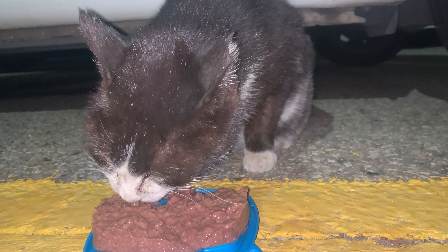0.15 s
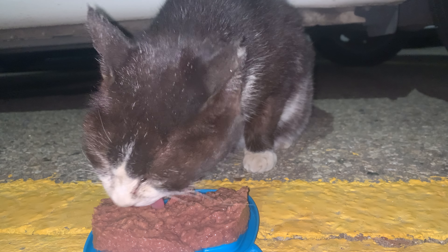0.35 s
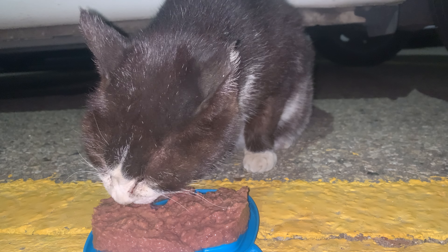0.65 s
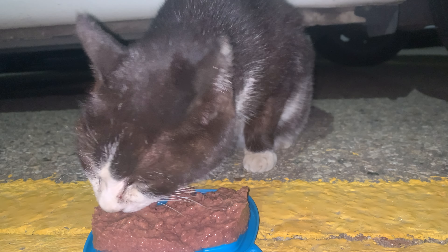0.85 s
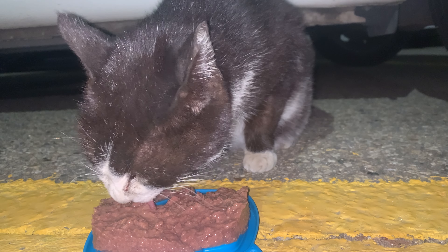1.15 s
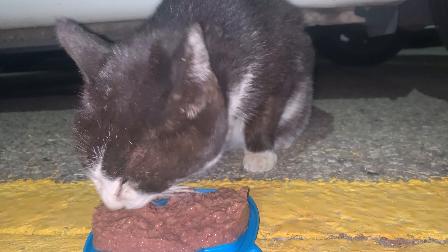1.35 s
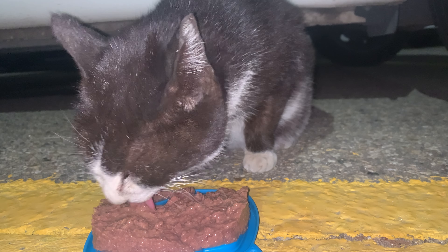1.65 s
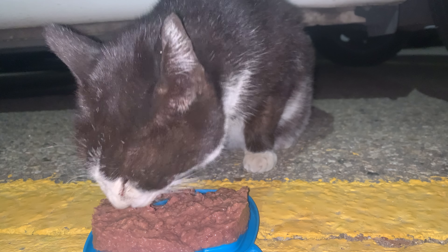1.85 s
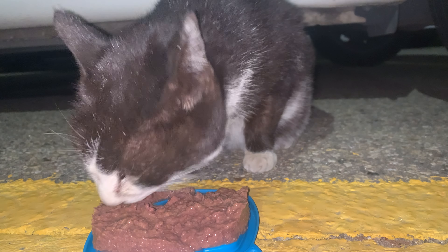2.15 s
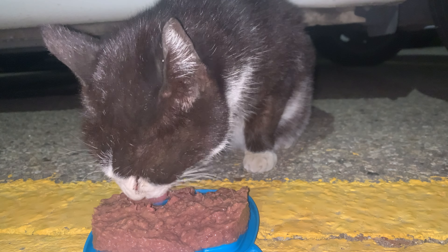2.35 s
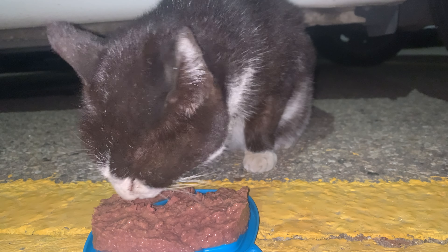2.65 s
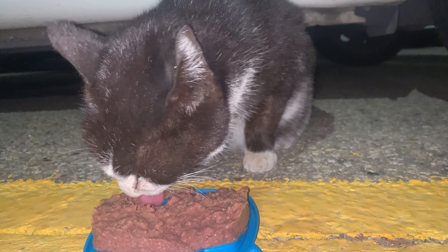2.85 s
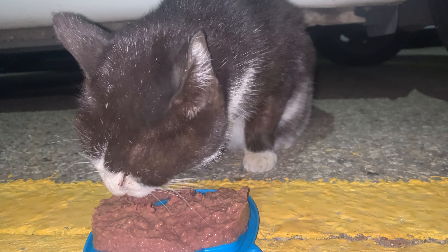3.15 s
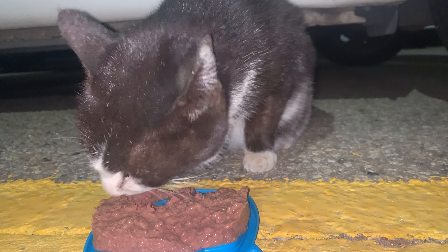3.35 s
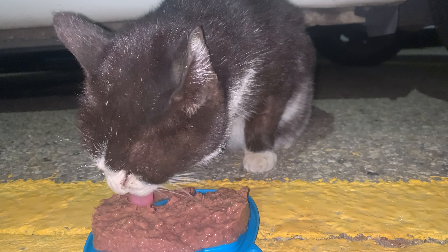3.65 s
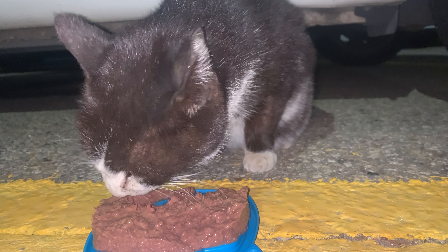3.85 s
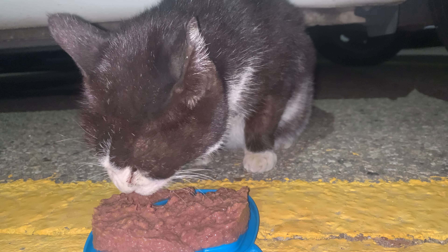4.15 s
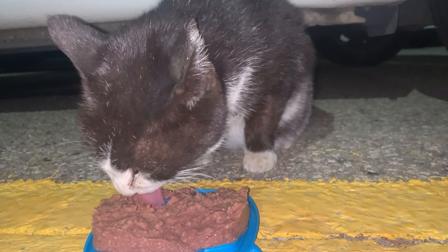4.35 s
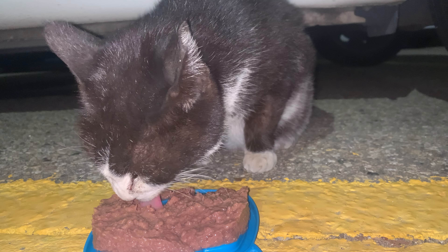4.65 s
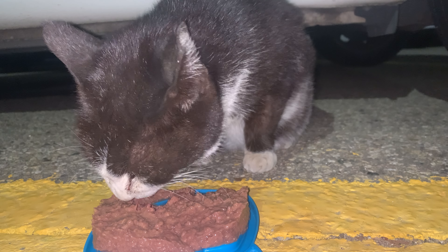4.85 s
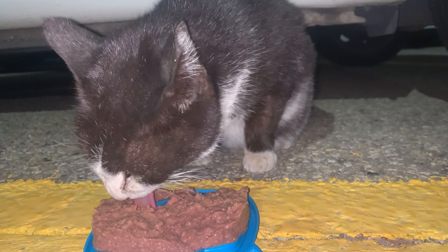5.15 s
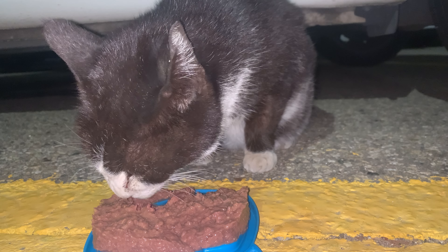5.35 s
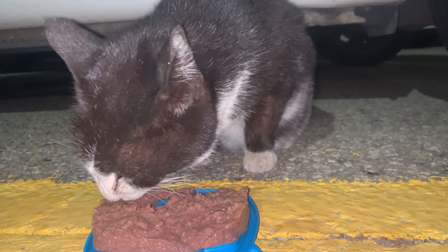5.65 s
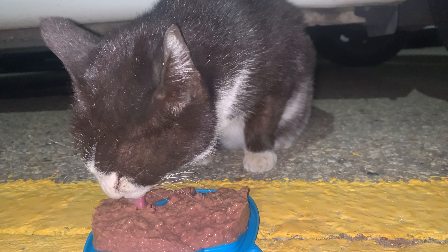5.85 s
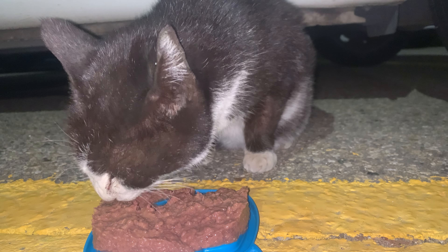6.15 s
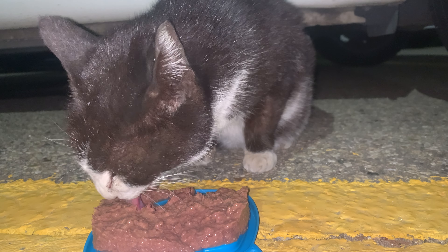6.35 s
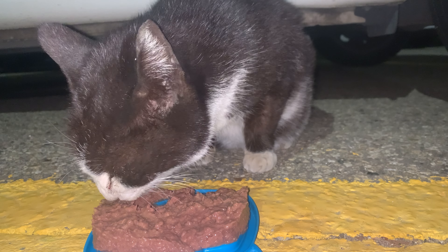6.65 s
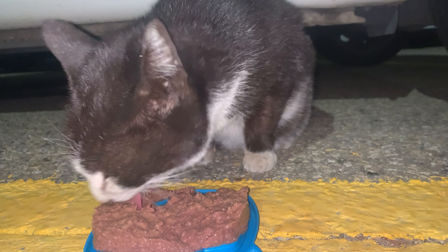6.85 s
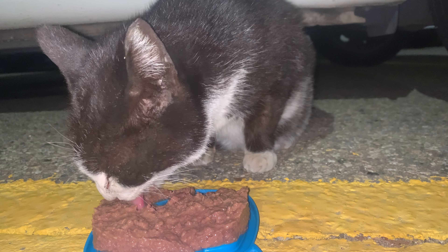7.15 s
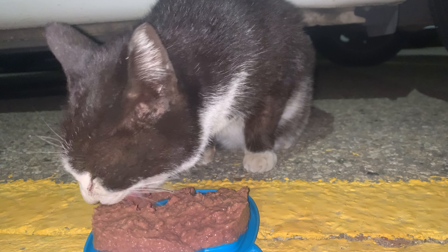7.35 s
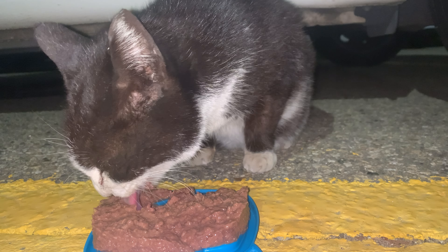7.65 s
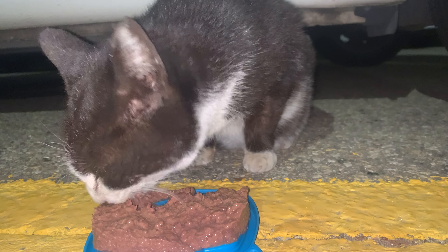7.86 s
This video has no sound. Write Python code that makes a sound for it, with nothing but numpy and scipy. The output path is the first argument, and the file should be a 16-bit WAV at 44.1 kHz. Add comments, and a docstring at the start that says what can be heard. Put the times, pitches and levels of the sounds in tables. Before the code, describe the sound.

A low, soft traffic rumble lies under the whole eight seconds, with bass noise rising and falling and a faint hiss. Small metallic taps come from the right at 0.2 and 0.4 s. Close by, a cat's tongue makes tiny bright wet ticks and faint strokes through paste around 0.5 to 1.25 s. At 1.75 to 1.9 s metal clatters loudly with a ringing, jangling burst, and another clank follows at 2.25 s. Light rattles, wet ticks and short hollow blips lead from 2.4 s, with a soft smeary lick at 3.15 s. The hardest clang hits at 3.6 s, booming and bright, then rocks and knocks until about 4.5 s, its tail fading in the open yard. Faint metal friction lingers until 6 s. Sparse taps and licks continue, with a clear blip at 5.7 s. From 7.2 s a distant motor hums in, wavering and slightly rising.

```python
"""At night, far traffic noise lies under everything, with low bass noise that rises and falls.
Early on, to the right, metal in a yard is struck: flurries of contacts ring its modes, and some boom.
Soon a cat close by licks wet food from a dish beside a parked car: ticks are short sinking tones, strokes are
swells of noise grains. Short hollow blips follow, ringing tones with noise. The metal also rocks and slides.
Near the end a distant motor fades in, speeding up a little: wavering partials over a low noise rumble."""
import sys
import numpy as np
from scipy import signal
from scipy.fft import irfft
from scipy.io import wavfile
from scipy.ndimage import uniform_filter1d

SR = 44100
rng = np.random.default_rng(int(sys.argv[2]) if len(sys.argv) > 2 else 0)


def pcm_store(signal):
    """Save signal as 16-bit PCM."""
    levels = np.round(np.clip(np.atleast_2d(signal), -1, 1) * 32767)
    wavfile.write(sys.argv[1], SR, levels.astype(np.int16).T)


N = 353682  # length in samples

# Colour of the night air. Each row: pitch in Hz, relative strength in dB per Hz.
AIR_COLOUR = [(15, -51.5), (30, -28.5), (43, -5.5), (60, 0.5), (100, -5.5), (165, -12.5), (300, -21.5),
              (600, -23.5), (950, -19), (1700, -28), (2400, -37), (3200, -51.5), (4200, -59), (7000, -74)]
AIR_DB = -43  # level before the swells change it
# Left-right likeness used for air and hiss; the top treble is mono.
# Each row: pitch in Hz, likeness from -1 to 1.
AIR_LIKENESS = [(60, 0.96), (110, 0.96), (200, 0.827), (380, 0.54), (700, -0.35), (1290, -0.38),
                (2380, 0.2), (4400, -0.17), (8120, -0.51), (15000, 1)]
# Swells of the background. Each row: time in seconds, then the swell in dB of the rumble, the drone and
# the upper hiss (partly the metal's lingering ring), each scaled by its reach below.
AIR_SWELLS = [(0, -3, 2, 0.5), (1.1, -3.5, 3.5, 5), (1.6, -5.5, 3, -0.5), (3.3, -1.5, 1, 9),
              (4.4, -3.5, 4, 5.5), (5.901, -3, 1.5, -1.5), (7.2, -5, -1.5, 3.5), (7.55, 6, -1, 12),
              (8.02, -10, 3.5, 8.5)]
# How much of its swell each part gets. Each row: pitch in Hz, share as a factor.
RUMBLE_REACH = [(100, 0.71), (200, 0.043)]
DRONE_REACH = [(90, 0.026), (190, 0.38), (280, 0.872), (420, 0.33), (800, 0.36), (2500, 0.464)]
HISS_REACH = [(2500, 0.13), (3400, 1.04), (4300, 1.12), (7000, 0.22), (11000, 0.11)]
# The low bass noise. Each row: time in seconds, level in dB.
BASS_LEVEL = [(0, -48), (1.3, -48.5), (1.8, -42.5), (3.7, -45.5), (4.3, -48), (4.7, -49), (6.2, -54),
              (6.801, -45), (8.02, -54)]

# Blows on the metal. Each row: start in seconds, strength in dB, brightness in dB per octave,
# basic rattle time in seconds, pitch of the struck spot in Hz, its boost in dB, level of the high singing in dB.
METAL_BLOWS = [(.209, -48, -3.5, 0.0098, 1250, 4.5, -77), (.229, -54.5, 7, 0.0084, 1400, 10, -62),
               (.426, -62.5, -5, 0.0031, 1050, 4, -92), (.55, -77, -9.5, 0.0086, 396, 2, -92),
               (1.757, -39.5, -2.5, 0.0098, 1110, 1.5, -71), (1.7695, -27, 1.5, 0.004, 990, 4.5, -57),
               (1.786, -35.5, 4, 0.013, 1400, 7, -47), (1.852, -32.5, -0.1, 0.0065, 1560, 1, -47),
               (1.871, -43.5, 5, 0.0047, 1590, 3, -53), (1.892, -40, 2.5, 0.0075, 1400, -4, -45.5),
               (2.176, -56, 2, 0.0084, 1500, 4, -74), (2.246, -39, -2.5, 0.0071, 1070, 5.5, -68),
               (2.256, -36, 2.5, 0.0062, 1150, 2, -52), (2.558, -71, 9, .0125, 2000, -2, -81),
               (2.62, -70.5, 9, 0.011, 2000, 10, -80), (2.692, -50, -0.5, 0.019, 1500, -7, -72),
               (2.724, -50.5, 4, 0.0041, 1000, -1, -54), (2.818, -47, 2, 0.011, 1724, 4, -71),
               (3.329, -55, 4, 0.0074, 2210, 5, -63.5), (3.383, -45.5, 3.5, 0.0039, 6560, 8.5, -56.5),
               (3.601, -47.5, 1, 0.0045, 1986, 18, -60), (3.609, -23.5, 1, 0.0055, 1700, 6.5, -44.5),
               (3.63, -27.5, 5.5, 0.0051, 2130, 4.5, -34.5), (3.635, -28.5, 0, 0.0039, 1450, 8, -56),
               (3.661, -34, 0.5, 0.0049, 2130, 5, -43), (3.744, -30, 1.6, 0.003, 1400, -9, -49),
               (3.829, -41.5, 0, 0.02, 2030, 4.5, -60), (3.884, -38, 2, 0.0085, 1910, 2, -45),
               (4.164, -49.5, -1.5, 0.008, 1700, 9.5, -62), (4.332, -47.5, 1.5, 0.0075, 1500, 1, -61),
               (4.434, -51.5, 0.5, .003, 1800, 0, -73), (4.476, -51.5, -0.4, 0.0021, 3880, 8.5, -80),
               (5.14, -53.5, 0, 0.0073, 1280, 4, -67), (5.259, -58, 2.5, 0.003, 1310, 12, -74),
               (5.526, -56, -3, 0.00217, 3400, 11.5, -81), (7.511, -65.5, -6.5, 0.015, 301, 7, -90),
               (7.99, -47, -4.5, 0.0098, 1110, 2.5, -72)]
# The metal's thud, clunk, clank, ring and jingle. Each row: lowest and highest pitch in Hz.
REGISTER_BANDS = [(120, 700), (700, 1400), (1400, 2700), (2700, 7000), (7000, 17000)]
# The same five. Each row: dB in a full blow, growth in dB per dB of strength,
# extra rattle length in a full blow as a multiple (below zero shortens it).
REGISTER_SETTINGS = [(1, 0.91, 2.5), (7, 1.05, -0.5), (3, 1.03, 0), (-7.5, 0.88, 3), (-4.5, 1.092, 1)]
# The metal's many close modes. Each row: pitch in Hz, relative strength in dB per Hz.
METAL_COLOUR = [(140, -9.5), (200, -9.5), (270, 1.5), (340, -0.5), (430, -4), (540, 2), (650, -11),
                (790, -2), (920, 3.5), (1000, -1), (1070, 0.5), (1170, -0.5), (1350, -1), (1510, -1),
                (1660, -3), (1920, -5), (2100, -6), (2450, -9.5), (2900, -13), (4250, -19), (4680, -23),
                (5150, -17.5), (5550, -20.5), (6400, -15.5), (7400, -19), (8200, -12.5), (9800, -9.5),
                (12500, -21.5), (14200, -17), (15700, -19)]
# Single modes that ring on. Each row: pitch in Hz, dB added to the metal's colour and a shared level.
RINGING_MODES = [(802, 2), (926, 1), (1055, 2), (1324, 1), (1475, 2), (1660, 2), (2083, 4), (2243, 1),
                 (2660, 3), (3050, 3), (3340, 5), (3396, 6), (3994, 5), (4301, 2), (4470, 6), (4905, 4),
                 (5011, 5), (5124, 6), (5184, 7), (5932, 5), (6630, 6), (8128, 6), (8198, 5), (8624, 6),
                 (10109, 9), (10282, 5), (10804, 5), (10965, 5), (11924, 6), (12177, 5), (13899, 8),
                 (14160, 2)]
# How long single modes ring. Each row: pitch in Hz, time in seconds to fall 60 dB.
RINGING_TIMES = [(850, .16), (2000, .22), (4100, .28), (5150, .42), (6500, .34), (10000, .28), (14000, .28)]
# The yard's tail. Each row: pitch in Hz, time in seconds to fall 60 dB.
YARD_TAIL = [(200, 1), (1000, 0.6), (2500, 0.68), (5000, 0.68), (9000, 0.38), (15000, .3)]
# Left-right likeness used for the metal; its top treble is mono, before the balance and phase below.
# Each row: pitch in Hz, likeness from -1 to 1.
METAL_LIKENESS = [(200, 1), (500, 0.92), (1000, 0.42), (4000, 0.24), (8000, 0.27), (12000, 1)]
# Where the metal stands. Each row: pitch in Hz, phase in radians by which left leads (negative: lags).
METAL_LEAD = [(100, -.05), (300, -.5), (700, -2), (950, -1.5), (1350, -2.5), (1800, -4.1), (2200, -5.3),
              (3000, -9), (4200, -12.5), (16000, -12.6)]
# Where the metal stands. Each row: pitch in Hz, left level minus right level in dB.
METAL_BALANCE = [(250, -.5), (540, -6.5), (900, -6), (1300, -2.5), (2400, .5), (4400, 3.5), (8000, .5)]
# How unevenly each spot favours the modes. Each row: pitch in Hz, unevenness in dB.
SPOT_RIPPLE = [(500, 1), (2000, 2), (4000, 3.5), (14000, 4)]
# The longest-singing clusters of modes. Each row: middle in Hz, width in Hz, relative level in dB
# before a random change, time in seconds to fall 60 dB.
SINGING_CLUSTERS = [(3330, 50, -5, .36), (4010, 55, -6, 0.3), (4440, 50, -13, .38), (5146, 150, 1, 0.37),
                    (5930, 63, -7, .33), (6630, 90, -8, 0.28), (8200, 340, -7.5, .4)]
PIVOT_HZ, FULL_DB = 2160, -17.5  # brightness tilts the colour about this pitch; strength of a full blow
FULL_TOP_HZ, TOP_HZ_PER_DB = 18300, 195.5  # a full blow reaches this high; a softer one less so
# Single modes that boom or sing out. Each row: start in seconds, pitch in Hz, level in dB at the right port,
# rise in seconds, time in seconds to fall 60 dB.
BOOMING_MODES = [(.212, 340, -29, .002, .05), (.22, 870, -33.5, .008, .18),
                 (.431, 391, -40.5, 0.0083, 0.17), (.548, 340, -45, .008, .12),
                 (1.772, 5140, -41.5, 0.011, 0.37), (1.892, 5160, -45, .006, 0.48),
                 (3.632, 5120, -35, .006, 0.26), (4.168, 5200, -57, 0.0044, 0.23),
                 (4.333, 5180, -50.5, 0.0032, 0.17), (4.475, 3920, -50, 0.0009, 0.046),
                 (1.771, 790, -23, 0.0038, 0.098), (1.772, 562, -26, 0.0067, 0.27),
                 (1.774, 1620, -23, .003, .08), (1.855, 1336, -26, .003, .1),
                 (1.856, 4000, -45, .004, 0.27), (1.78, 3390, -31.5, .006, 0.24),
                 (2.246, 1044, -21.5, .003, .09), (2.254, 1360, -27, 0.0033, .08),
                 (2.256, 1550, -25, .003, .13), (3.614, 259.7, -14, .023, 0.07),
                 (3.61, 873, -9.5, 0.0057, .06), (3.618, 1520, -17, .004, 0.099),
                 (3.612, 2246, -21, 0.0033, 0.15), (3.661, 2092, -21.5, .003, 0.084),
                 (3.745, 2680, -34, .003, 0.065)]

# Wet ticks of the tongue. Each row: time in seconds, level in dB before filtering, starting pitch in Hz.
TONGUE_TICKS = [(0.508, -54, 12000), (0.569, -53, 10000), (0.6444, -23, 10300), (0.9652, -49, 11700),
                (1.0107, -36, 9460), (1.0207, -49, 6300), (1.0998, -25.5, 5730), (1.1931, -46, 5990),
                (1.2526, -51, 10500), (2.5187, -46, 6520), (2.176, -42, 9500), (2.8672, -30, 6560),
                (2.8826, -35, 8380), (3.29, -32.5, 6900), (5.8067, -39.5, 5000), (6.8605, -36, 10560),
                (7.2516, -39.5, 6870), (7.6, -47.5, 8100), (7.7111, -42.5, 6980), (7.7297, -49, 6760)]
# Threads of saliva snap faintly around each stroke: typical level, typical pitch and spread in time.
STRAY_DB, STRAY_HZ, STRAY_SPREAD_S = -53, 9380, .13
# Strokes through the food. Each row: start in seconds, length in seconds, level in dB, pitch in Hz.
LICK_STROKES = [(0.616, 0.069, -65.5, 8500), (0.796, 0.053, -79, 7500), (0.979, 0.18, -72.5, 7000),
                (3.151, 0.11, -51.5, 2060), (3.183, 0.11, -71, 7000), (4.752, 0.04, -64, 4360),
                (5.785, 0.054, -71.5, 5200), (6.745, .045, -75.5, 7000), (7.166, 0.032, -69.5, 7450),
                (7.196, 0.096, -67.5, 6470), (7.687, 0.13, -72.5, 6070)]

# Knocks of the rocking metal. Each row: start in seconds, level in dB, pitch of the struck spot in Hz.
ROCKING_KNOCKS = [(1.939, -45, 800), (1.988, -51, 900), (2.389, -46, 1030), (3.94, -40.5, 2050),
                  (3.97, -42.5, 1810), (4.02, -39.5, 1350), (4.07, -42, 1690), (4.147, -40.5, 1500)]
ROCK_BOOST_DB, ROCK_RATTLE_S, ROCK_TOP_HZ = -1, 0.013, 3380
# Short hollow blips, some from the mouth and some from ringing metal. Each row: start in seconds,
# level in dB before mixing and filtering, middle of the pitch glide in Hz, rise in seconds,
# time in seconds for the ring to fall 60 dB.
HOLLOW_BLIPS = [(2.384, -41.5, 1044, .01, 0.077), (2.673, -46, 1496, .004, 0.075),
                (2.839, -45, 1470, .001, 0.046), (2.864, -39, 1593, .003, 0.11),
                (3.054, -38.5, 1807, .002, 0.12), (3.076, -38.5, 1790, 0.0011, .04),
                (3.166, -41, 1570, 0.0018, 0.072), (3.189, -41, 956, .001, .04),
                (3.2, -55, 2050, .002, 0.065), (3.223, -36, 933, .007, 0.053),
                (3.406, -41, 996, .003, 0.056), (3.424, -37.5, 2140, .002, .09),
                (3.7255, -19, 1320, .0005, 0.031), (3.829, -31, 1100, .001, 0.055),
                (3.832, -41, 1600, .001, 0.044), (3.885, -33, 1340, .003, .06),
                (3.974, -42, 1810, .002, 0.064), (4.022, -38.5, 930, .005, .07),
                (4.042, -43, 1450, .001, 0.047), (4.073, -42, 903, 0.0034, .06),
                (4.124, -38, 910, .004, 0.12), (4.151, -47, 1910, .002, .05),
                (4.3005, -28.5, 1400, .0007, 0.06), (4.475, -37, 950, .001, 0.032),
                (5.729, -26.5, 1268, .0003, 0.063)]
BLIP_TONE = .85  # gain of the clear pitch in a blip
SLIDE_START_S, SLIDE_END_S, SLIDE_FADE_S, SLIDE_DB = 2.8, 6.01, 0.33, -72
MOTOR_START_S, MOTOR_RISE_S, MOTOR_HZ, MOTOR_HZ_PER_S = 7.22, 0.22, 114.4, 7.35
MOTOR_DB = -46.5  # level of the hum
# The motor's partials. Each row: multiple of the firing rate, relative level in dB.
MOTOR_MIX = [(1, -9), (2, 0), (3, -6.5), (4, -13.5), (5, -17.5)]

# The microphone's own hiss. Each row: pitch in Hz, relative strength in dB per Hz.
HISS_COLOUR = [(3000, -13), (6500, -1.5), (7800, 5), (9000, 1), (11500, 0), (15000, -10)]
HISS_DB, EDGE_HZ = -79, 15850  # hiss level; the recorder passes nothing much above the edge


def amp(db):
    """Turns decibels into a gain."""
    return 10 ** (np.asarray(db) / 20)


def evened(x):
    """Scales a signal to an average (rms) level of 1."""
    return x / np.sqrt(np.mean(x ** 2) + 1e-30)


def read(points, hz):
    """Reads between the rows of a pitch table, on a log scale of pitch."""
    f, value = np.transpose(points)
    return np.interp(np.log(hz + 1), np.log(f + 1), value)


def add(mix, s, sound):
    """Mixes a sound in at time s."""
    part = mix[..., max(round(s * SR), 0):][..., :sound.shape[-1]]
    part += sound[..., :part.shape[-1]]


def band(x, lo, hi, order=4):
    """Keeps only the pitches between lo and hi."""
    sos = signal.butter(order, [lo, min(hi, SR / 2 - 1)], "band", fs=SR, output="sos")
    return signal.sosfilt(sos, x)


def low_order_noise(size, lo, hi):
    """Gently filtered noise between lo and hi, at level 1."""
    return evened(band(rng.standard_normal(size), lo, hi, order=2))


def lumps(depth_db=3, low_hz=4, top_hz=14):
    """An uneven swelling and sinking of level."""
    return evened(amp(depth_db * np.clip(low_order_noise(N, low_hz, top_hz), -2, 2)))


def boost(x, hz, db, q=3.8):
    """Changes one resonance by db: it stands out, or sinks if db is negative."""
    return x + (amp(db) - 1) * signal.lfilter(*signal.iirpeak(hz, q, fs=SR), x)


def port_spectra(hz, likeness):
    """Random spectra at the left and right microphone ports, alike as far as the table says."""
    a, b = np.exp(2j * np.pi * rng.random((2, len(hz))))
    same = np.clip(read(likeness, hz), -1, 1)
    return np.array([same * a + np.sqrt(1 - same ** 2) * b, a])


def port_noise(colour):
    """Steady coloured noise at the two ports, at level 1."""
    hz = np.fft.rfftfreq(N, 1 / SR)
    return evened(irfft(port_spectra(hz, AIR_LIKENESS) * amp(read(colour, hz)), N))


def night_air(patchy_db=2.0):
    """Distant town noise, whose rumble, drone and upper hiss swell and sink."""
    wash = amp(AIR_DB) * port_noise(AIR_COLOUR)
    f, t, z = signal.stft(wash, SR, nperseg=2048, noverlap=1536)
    s, *swells = np.transpose(AIR_SWELLS)
    field_db = np.zeros((len(f), len(t)))
    for reach, swell in zip([RUMBLE_REACH, DRONE_REACH, HISS_REACH], swells):
        field_db += np.outer(read(reach, f), np.interp(t, s, swell))
    # smooth random patches over pitch and time
    patches = uniform_filter1d(rng.standard_normal(field_db.shape), size=14, axis=0)
    field_db += patchy_db * evened(uniform_filter1d(patches, size=8, axis=1))
    return signal.istft(z * amp(field_db), SR, nperseg=2048, noverlap=1536)[1][:, :N]


def bass_noise(hz=66, width_hz=14):
    """Low bass noise near 66 Hz, rising and falling: a narrow band is unsteady by itself."""
    level_db = np.interp(np.arange(N) / SR, *np.transpose(BASS_LEVEL))
    return amp(level_db) * low_order_noise(N, hz - width_hz / 2, hz + width_hz / 2)


def from_the_side(hz):
    """Gain and phase of the metal at the left port, against the right."""
    return np.exp(1j * read(METAL_LEAD, hz)) * amp(read(METAL_BALANCE, hz))


def metal_response(early_t60=0.14, late_db=-13, direct_db=6, direct_t60=0.0082, rings_db=-21.5, size=32768):
    """One contact as heard from the side: a snap, a fast dense clang, the yard's tail, and single modes."""
    t, hz = np.arange(size) / SR, np.fft.rfftfreq(size, 1 / SR)
    z = port_spectra(hz, METAL_LIKENESS) * amp(read(METAL_COLOUR, hz))
    favour = evened(uniform_filter1d(rng.standard_normal(len(hz)), size=70))
    z *= amp(read(SPOT_RIPPLE, hz) * np.clip(favour, -2, 2))
    z[0] *= from_the_side(hz)
    f, when, frames = signal.stft(evened(irfft(z)), SR, nperseg=256)
    clang = amp(-60 * when / early_t60)
    tail = amp(late_db - 60 * when / read(YARD_TAIL, f)[:, None])
    out = signal.istft(frames * np.hypot(clang, tail), SR, nperseg=256)[1][:, :size]
    out = out * (1 + amp(direct_db - 60 * t / direct_t60))  # the snap
    for mode_hz, db in RINGING_MODES:
        # each mode swings in step with the clang at its own pitch
        turn = np.exp(2j * np.pi * mode_hz * t)
        phase = np.angle((out / turn).sum(1, keepdims=True))
        mode_db = db + rings_db + read(METAL_COLOUR, mode_hz)
        swing = amp(mode_db - 60 * t / read(RINGING_TIMES, mode_hz))
        out += swing * (turn * np.exp(1j * phase)).real
    return out


def singing(spread_db=3, size=32768):
    """Close clusters of high modes that beat together and outlast the clang; each spot favours other ones."""
    t, out = np.arange(size) / SR, 0
    for hz, width, db, t60 in SINGING_CLUSTERS:
        fade = amp(db + spread_db * rng.uniform(-1.1, 1) - 60 * t / t60)
        cluster = low_order_noise((2, 2 * size), hz - width / 2, hz + width / 2)
        out = out + fade * cluster[:, size:]  # skip the filter's start
    return out * (1 - np.exp(-t / .001))


def rattle(time_s, contacts_per_s=2600, first=0.89, tail_shape=0.8, size=6144):
    """A first contact and a flurry of smaller ones: a short knock snaps, a long rattle swells."""
    time_s = max(time_s, 1e-3)
    u = np.arange(size) / SR / time_s
    contacts = rng.standard_normal(size) * (rng.random(size) < contacts_per_s / SR)
    contacts *= np.sqrt(u) * np.exp(1 - u ** tail_shape)
    contacts[0] = first * min(0.0056 / time_s, 3) ** 2
    return contacts


def strike(voice, contacts):
    """Contacts ring a voice of the metal; its loudest moment has level 1."""
    sound = signal.fftconvolve(voice, contacts[None], axes=1)
    power = uniform_filter1d((sound ** 2).mean(0), size=660, mode="constant")
    return sound / np.sqrt(power.max())


def clatter(places, looseness=0.64):
    """Blows ring the metal; sharper ones are brighter, harder ones reach higher and jingle longer."""
    out = np.zeros((2, N))
    voices = [[band(place, lo, hi, order=3) for lo, hi in REGISTER_BANDS] for place in places]
    clusters = [singing() for _ in places]
    octaves = np.log2(np.sqrt(np.prod(REGISTER_BANDS, axis=1)) / PIVOT_HZ)
    for k, (s, db, brightness, rattle_s, spot_hz, spot_db, sing_db) in enumerate(METAL_BLOWS):
        spot = k % len(places)
        force_db, sound = db - FULL_DB, 0
        shake = amp(force_db) ** looseness
        for voice, octave, (register_db, growth, linger) in zip(voices[spot], octaves, REGISTER_SETTINGS):
            contacts = rattle(rattle_s * (1 + linger * shake))
            voice_db = FULL_DB + register_db + growth * force_db + brightness * octave
            sound = sound + amp(voice_db) * strike(voice, contacts)
        sound = boost(sound, spot_hz, spot_db)
        sound = sound + amp(sing_db) * strike(clusters[spot], rattle(rattle_s))
        top_hz = np.clip(FULL_TOP_HZ + TOP_HZ_PER_DB * force_db, PIVOT_HZ, SR / 2 - 1)
        add(out, s, signal.sosfilt(signal.butter(2, top_hz, fs=SR, output="sos"), sound))
    return out


def boom(size=16000):
    """One mode swells and rings on above the clang."""
    out, t = np.zeros((2, N)), np.arange(size) / SR
    for s, hz, db, rise, t60 in BOOMING_MODES:
        swing = (1 - np.exp(-(t / rise) ** 2)) * amp(-60 * t / t60)
        turning = np.exp(2j * np.pi * (hz * t + rng.random()))
        tone = np.outer([from_the_side(hz), 1], turning).real
        add(out, s, amp(db) * swing / swing.max() * tone)
    return out


def stray_ticks(spread_db=3, spread_octaves=0.16):
    """One faint tick falls at random around each stroke, as a row like those of the tongue's ticks."""
    rows = []
    for s, length, _, _ in LICK_STROKES:
        when, loud, high = rng.standard_normal(3)
        middle = s + length / 2
        pitch_hz = STRAY_HZ * 2 ** (spread_octaves * high)
        rows.append((middle + STRAY_SPREAD_S * when, STRAY_DB + spread_db * loud, pitch_hz))
    return rows


def threads(per_s=500, db=-20, t60=0.044, size=1000):
    """One snap and a sparse, fading crackle after it."""
    snaps = rng.standard_normal(size) * (rng.random(size) < per_s / SR)
    snaps *= amp(db - 60 * np.arange(size) / SR / t60)
    snaps[0] = 1
    return snaps


def ticks(t60=0.00036, sag=0.32, sag_time=0.001, low_hz=5400, top_hz=12500, size=400):
    """A film of saliva snaps: a few cycles that fall in pitch, then a faint crackle as its threads part."""
    out, t = np.zeros(N), np.arange(size) / SR
    for s, db, hz in list(TONGUE_TICKS) + stray_ticks():
        pitch = np.minimum(hz, 14000) * (1 - sag * (1 - np.exp(-t / sag_time)))
        tone = np.sin(2 * np.pi * np.cumsum(pitch) / SR)
        snap = tone * amp(-60 * t / t60) * (1 - np.exp(-t / .0001))
        add(out, s + 0.00045, amp(db) * np.convolve(snap / abs(snap).max(), threads()))
    return band(out, low_hz, top_hz, order=5)


def licks(grains_per_s=1800, spread_db=1.0, pocket_db=5):
    """The rough tongue drags through paste: a swell of tiny wet grains that ring a small pocket."""
    out = np.zeros((2, N))
    for s, length, db, hz in LICK_STROKES:
        n = round(length * SR)
        loudness = amp(spread_db * np.minimum(rng.exponential(1, (3, n)), 4))
        grains = rng.standard_normal((3, n)) * loudness * (rng.random((3, n)) < grains_per_s / SR)
        both = grains[:2] * 3.0 + grains[2]  # the third stream is shared by left and right
        stroke = band(both * signal.windows.hann(n), hz * 0.29, hz * 1.24, order=5)
        add(out, s, amp(db) * evened(boost(stroke, hz, pocket_db)))
    return out


def rocking(places, low_hz=250):
    """After hard blows the metal rocks to rest: dull knocks, taking its spots in turn."""
    out = np.zeros((2, N))
    voices = [band(place, low_hz, ROCK_TOP_HZ, order=2) for place in places]
    for k, (s, db, hz) in enumerate(ROCKING_KNOCKS):
        voice = boost(voices[k % len(voices)], hz, ROCK_BOOST_DB)
        add(out, s, amp(db) * strike(voice, rattle(ROCK_RATTLE_S)))
    return out


def hollow_blips(scatter=0.45, echo_db=-25, echo_t60=0.54, top_hz=2600, glide=0.043, glide_s=.008, size=12000):
    """A short hollow tone, from the mouth or from ringing metal, sinks slightly amid a spray of noise."""
    out, t = np.zeros((2, N)), np.arange(size) / SR
    for s, db, hz, rise, t60 in HOLLOW_BLIPS:
        onset = 1 - np.exp(-t / rise)
        ring = amp(-60 * t / t60) * onset
        ring = ring / ring.max()
        turns = np.cumsum(hz * (1 + glide * (np.exp(-t / glide_s) - .5))) / SR
        tone = BLIP_TONE * ring * np.sin(2 * np.pi * turns)
        spray = low_order_noise((2, size), hz * 0.58, hz * 1.14)
        echo = onset * amp(echo_db - 60 * t / echo_t60)
        add(out, s, amp(db) * (tone + spray * (scatter * ring + echo)))
    return band(out, 400, top_hz) * amp([[-1.5], [0.5]])  # a little softer on the left


def slide(response, low_hz=3000, top_hz=4100, size=900):
    """Light, uneven friction stirs the middle modes of the metal and damps them at once."""
    t, friction = np.arange(N) / SR, rng.standard_normal((1, N))
    stirred = signal.fftconvolve(response[:, :size], friction, axes=1)[:, :N]
    sing = evened(band(stirred, low_hz, top_hz, order=2))
    fade = np.clip(np.minimum(t - SLIDE_START_S, SLIDE_END_S - t) / SLIDE_FADE_S, 0, 1)
    return amp(SLIDE_DB) * sing * lumps(depth_db=4) * fade


def motor(waver=0.061, waver_hz=30, rumble_db=4, rumble_low_hz=55, rumble_top_hz=115):
    """A distant motor hums with an unsteady firing rate, over the rumble of its exhaust."""
    age = np.maximum(np.arange(N) / SR - MOTOR_START_S, 0)
    unsteady = low_order_noise(N, 1.0, waver_hz)
    turns = np.cumsum((MOTOR_HZ + MOTOR_HZ_PER_S * age) * (1 + waver * unsteady)) / SR
    hum = np.zeros(N)
    for k, partial_db in MOTOR_MIX:
        hum += amp(partial_db) * np.sin(2 * np.pi * (k * turns + rng.random()))
    rumble = low_order_noise(N, rumble_low_hz, rumble_top_hz)
    both = evened(hum) + amp(rumble_db) * rumble
    return amp(MOTOR_DB) * both * lumps() * np.minimum(age / MOTOR_RISE_S, 1)


def scene():
    """The town all round, the metal to the right, the cat in front, and blips from mouth and metal."""
    places = [metal_response() for _ in range(5)]  # five spots on the metal
    background = night_air() + bass_noise() + motor()
    metal = clatter(places) + boom() + rocking(places) + slide(places[0])
    tongue = ticks() + licks()
    return background + metal + tongue + hollow_blips()


def record(dry):
    """Adds the microphone's hiss and cuts the treble at the recorder's upper limit."""
    hiss = amp(HISS_DB) * port_noise(HISS_COLOUR)
    lowpass = signal.firwin(511, EDGE_HZ, window=("kaiser", 9), fs=SR)
    return signal.oaconvolve(dry + hiss, lowpass[None], "same")


dry = scene()
out = record(dry)
pcm_store(out)
```